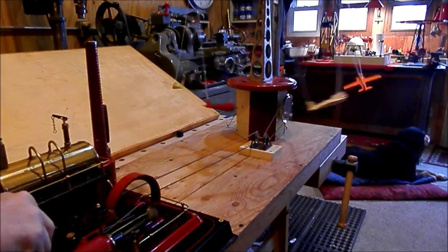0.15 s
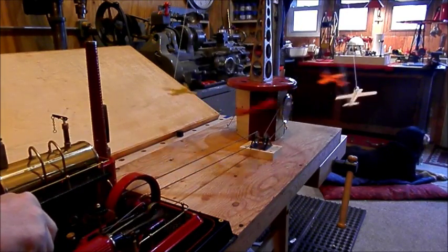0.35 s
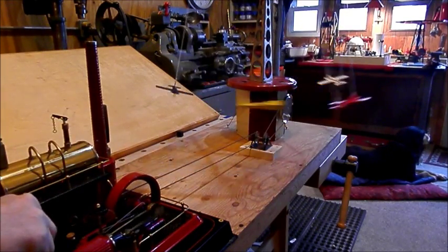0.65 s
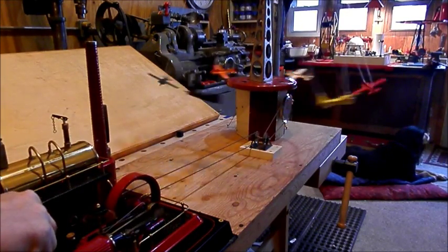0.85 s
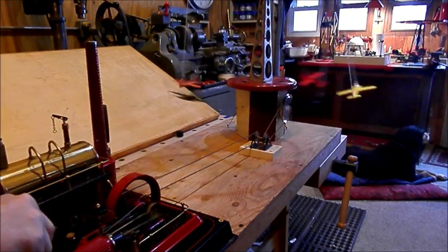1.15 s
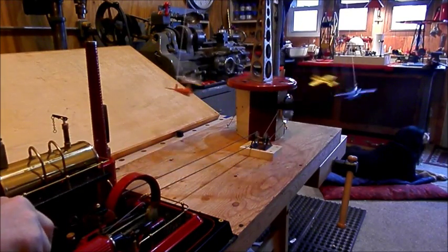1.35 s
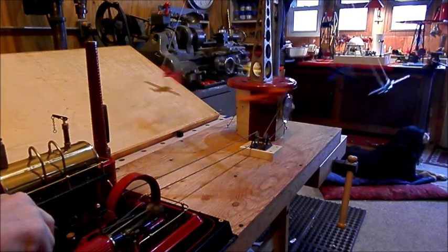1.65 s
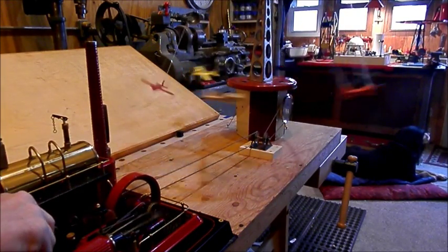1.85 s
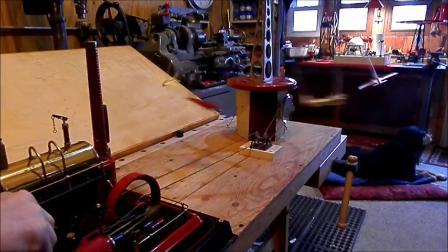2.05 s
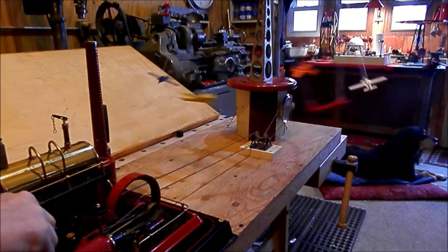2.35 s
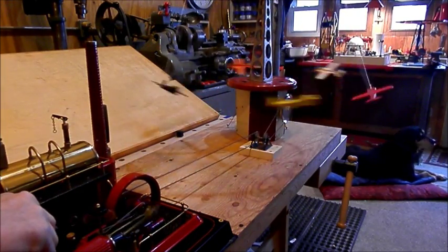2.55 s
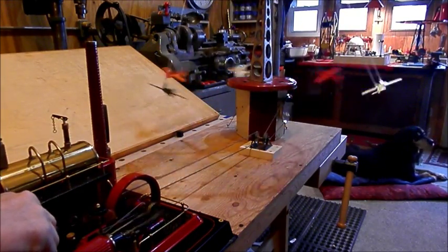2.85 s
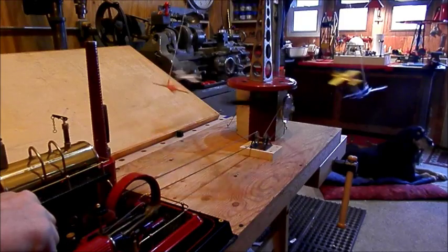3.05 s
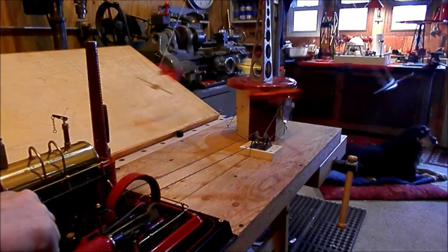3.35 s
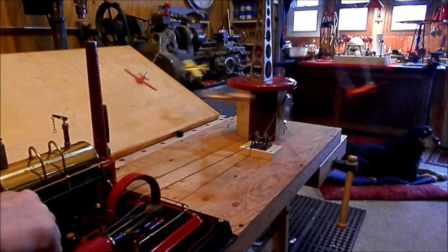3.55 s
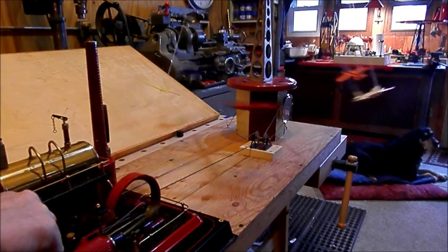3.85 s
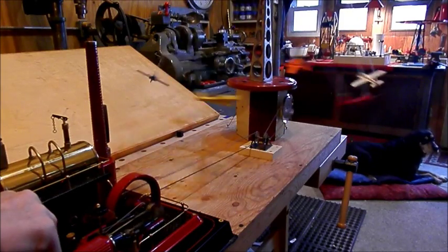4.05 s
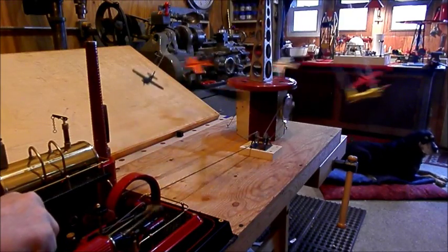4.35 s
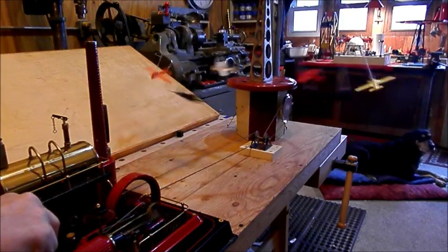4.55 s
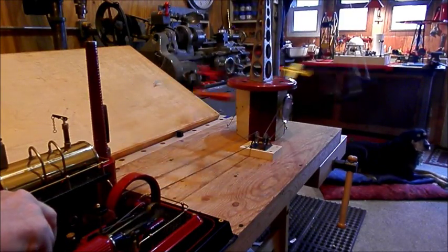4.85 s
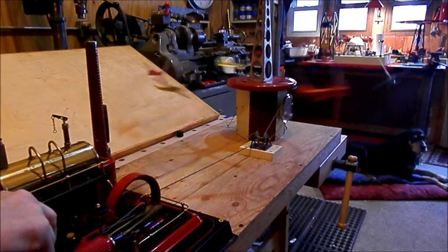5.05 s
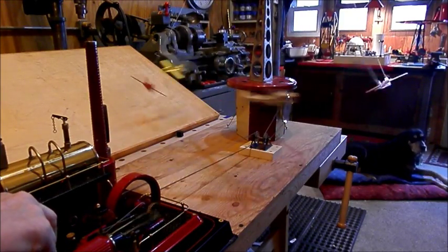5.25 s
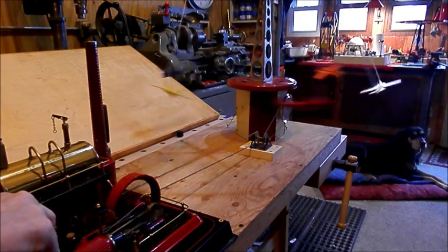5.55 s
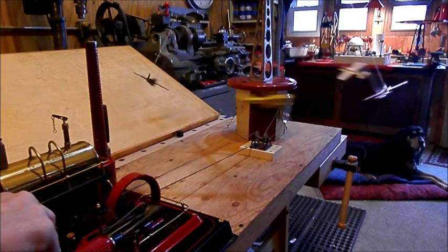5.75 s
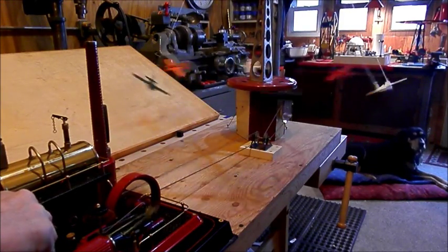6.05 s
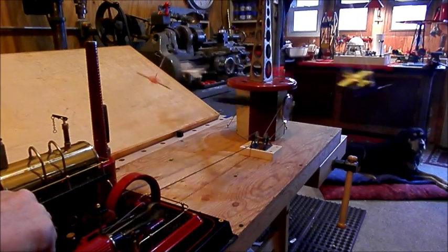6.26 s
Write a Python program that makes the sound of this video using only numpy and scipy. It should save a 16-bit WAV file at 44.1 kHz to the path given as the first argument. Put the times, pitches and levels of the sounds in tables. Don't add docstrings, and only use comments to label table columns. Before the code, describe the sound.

A toy steam engine clatters on a wooden bench, speeding from seven to about thirteen metallic knocks a second, with hiss and thin squeaks.

```python
import sys
import numpy as np
from scipy import signal
from scipy.fft import rfft, irfft, next_fast_len
from scipy.io import wavfile
from scipy.ndimage import uniform_filter1d, minimum_filter1d, map_coordinates

SR = 44100
rng = np.random.default_rng(int(sys.argv[2]) if len(sys.argv) > 2 else 0)


def dump(signal):
    limited = np.clip(np.atleast_2d(signal).T, -1, 1)
    pcm = np.round(limited * 32767).astype(np.int16)
    wavfile.write(sys.argv[1], SR, pcm)


def volts(x):
    e = np.asarray(x, float) / 20
    return 10 ** e


N = 282681

# frequency in Hz, t60 in seconds.
ROOM_DECAY = [(100, 0.054), (500, 0.11), (2500, 0.65), (5000, 0.48), (10000, 0.72)]
# frequency in Hz, density in dB per Hz.
RUMBLE_SPECTRUM = [(24, -52), (40, -21), (109, 10), (197, -7.5), (262, -2.5), (324, -1.5), (433, -0.5),
                   (595, -0.5), (703, -7), (843, -8), (909, -11), (1030, -5), (1120, -8.5), (1500, -22.5),
                   (1950, -31), (3300, -120)]
# frequency in Hz, density in dB per Hz.
STEAM_SPECTRUM = [(590, -9), (1000, -4), (1580, -2.5), (2320, 1), (2460, 0), (2870, -6), (3380, -12.5),
                  (3840, -3), (5710, -18), (6890, -17), (7930, -33), (9230, -28.5), (11100, -40.5),
                  (15300, -43), (16400, -57)]
# start in seconds, length in seconds, level in dB.
DRONE_SPELLS = [
    (-.5, 1.1, -52),
    (.4, 1.2, -58),
    (5.4, 1.2, -63),
]
# time in seconds, frequency in Hz.
DRONE_PITCH = [(0, 279), (.45, 270), (1.45, 279), (5.4, 265)]
# frequency in Hz, waver in Hz.
SQUEAL_TONES = [(6750, 17.8), (6905, 18), (7400, 14)]
# start in seconds, length in seconds, level in dB.
SQUEAL_SPELLS = [
    [(.2, 0.24, -50.5), (.58, 0.15, -53), (1.1, 0.1, -58), (1.33, 0.16, -51.5), (2.0, 0.099, -59),
     (2.88, 0.14, -52), (4.05, 0.2, -51), (4.54, 0.094, -53), (4.75, 0.19, -55), (5.64, 0.25, -52),
     (5.95, 0.054, -54), (6.32, 0.14, -56.5)],
    [(.85, 0.12, -62), (2.36, 0.2, -46.5), (3.04, 0.095, -50.5), (3.12, 0.24, -47), (3.3, 0.24, -49.5),
     (4.02, 0.13, -45.5), (4.78, 0.2, -46), (5.0, .14, -44.5), (5.66, 0.14, -47.5), (6.33, 0.078, -52.5)],
    [(1.39, 0.35, -48), (1.82, 0.19, -53.5), (3.56, .15, -59), (4.7, 0.089, -53), (5.0, 0.21, -72),
     (5.18, 0.15, -53), (6.33, .11, -64)],
]
# frequency in Hz, width in Hz, level in dB.
SCRAPE_PEAKS = [(5625, 190, 6.5), (6040, 250, 10.5), (6600, 220, 8), (6480, 200, 12.5), (6900, 1000, 3)]
# start in seconds, length in seconds, level in dB.
SCRAPE_SPELLS = [(-.1, 0.25, -47.5), (.1, 0.25, -55.5), (.6, 0.2, -69), (.8, 0.18, -68), (1.33, 0.16, -74),
                 (1.9, 0.48, -54), (2.85, 0.2, -59), (3.1, 0.37, -64), (3.57, 0.21, -58), (4.1, 0.15, -64),
                 (4.7, 0.51, -66), (5.25, 0.46, -57), (5.55, 0.54, -70), (6.3, 0.27, -65)]
# start in seconds, length in seconds, level in dB.
PULLEY_CHIRPS = [
    (0.714, 0.13, -51.5),
    (2.62, .06, -58),
    (4.215, 0.15, -55),
    (5.875, .045, -53),
]
# time in seconds, peak in dB.
ROD_SLAPS = [(0.0476, -37), (0.0725, -27), (0.094, -29.5), (0.106, -41), (0.453, -47), (0.4214, -40),
             (0.952, -35), (1.768, -36), (2.4535, -28.5), (3.1148, -52), (3.2754, -37), (4.6404, -40),
             (5.3432, -39), (5.66, -32)]
# frequency in Hz, level in dB, t60 in seconds, rise in ms.
FRAME_MODES = [(1306, -13.5, 0.03, 2.5), (1485, -11, 0.04, 3.4), (1737, -23.5, 0.061, 1.1),
               (1933, -27, 0.18, 3.9), (2074, -22, 0.088, 2.6), (2216, -13, 0.085, 3.5),
               (2500, -2.5, 0.032, 1.5), (2820, -15, 0.045, 2.9), (3048, -12, 0.026, 1.6),
               (3241, -2.5, 0.017, 0.96), (3255, -18, .19, 3), (3396, 3, 0.016, 0.24),
               (3607, -3.5, 0.018, 1.25), (3870, -12.5, 0.023, 0.27), (4290, -11.5, 0.019, 0.15),
               (4610, -12, 0.02, 0.28), (5076, -13, 0.021, 0.093), (5505, -15.5, 0.025, 0.2),
               (5890, -23.5, 0.033, 0.88), (5920, -12, 0.021, 0.13), (6910, -12, 0.019, 0.33),
               (7350, -41.5, 0.035, 0.64)]
# frequency in Hz, level in dB, t60 in seconds, rise in ms.
BENCH_MODES = [(79.6, -13, .13, 6.1), (113.3, -9.5, 0.31, 13), (127.2, -14, 0.2, 9.7),
               (259.6, -2, 0.17, 17), (356.7, -9, 0.2, 5.7), (435.2, -1, 0.14, 5.3), (483, -9.5, .12, 5.9),
               (591.8, -9, 0.22, 3.1), (707.7, -5, 0.071, 6.5), (840, -6.5, 0.17, 10.3),
               (805.5, -10, 0.12, 6.2), (982, -2.5, 0.15, 14), (1052, -2.5, 0.13, 9), (1305, -29, 0.033, 1)]
# frequency in Hz, density in dB per Hz.
CONTACT_SPECTRUM = [(1500, -19), (3000, -3), (5000, 1), (7000, -7.5), (9000, -9.5), (12000, -24.5),
                    (16000, -30)]
# time in seconds, turns per second.
SHAFT_SPEED = [(0, 7.17), (.5, 9.17), (.85, 10.309), (1.07, 10.673), (1.26, 10.662), (1.75, 11.819),
               (2.18, 11.596), (2.69, 12.236), (3, 11.986), (3.47, 12.648), (3.95, 12.223), (4.33, 12.588),
               (4.68, 12.488), (4.97, 12.85), (5.16, 13.018), (5.52, 12.593), (5.89, 12.97), (6.41, 12.884)]
# time in seconds, knock peak in dB.
PISTON_FORCE = [(0.12, -20), (.45, -22), (.69, -20.5), (.8, -22.5), (1.2, -23), (1.7, -22), (2.3, -21),
                (2.75, -21), (3.2, -22), (3.75, -23.5), (4.03, -21.5), (4.27, -21), (4.74, -22.5),
                (4.83, -19.5), (4.91, -22.5), (5.37, -22), (5.82, -19.5), (6.2, -22.7)]
# frequency in Hz, change in dB.
SLACK_COLOUR = [(1300, -4), (1483, 6.5), (1750, -10), (3075, 5.5), (3391, -6.5), (3614, 6.5), (3820, 5.5),
                (4640, -1.5)]
# frequency in Hz, dB per turn per second.
SPEED_COLOUR = [(90, 1), (116, 3.5), (123, -3), (260, 0), (440, -0.4), (478, -3), (845, 3), (1030, -0.8)]
# time in seconds, extra level in dB.
BASE_JOLTS = [
    (.79, 4),
    (1.36, 3),
    (2.65, -1),
    (4.03, 1),
    (4.19, 2.5),
    (4.83, 1),
    (5.14, 0),
    (5.84, 0.5),
    (5.92, 1),
]
# frequency in Hz, gain in dB.
MICROPHONE_RESPONSE = [(20, -23), (75, 3), (7350, 2.5), (7700, -10.5), (7900, -6), (8150, -18), (8400, 2.5),
                       (20000, 7)]

START_TURN = 0.114
CRUISE = 11.7
KNOCK_SCATTER_DB = 0.88
BENCH_DB, BENCH_GROWS, BENCH_SCATTER_DB = -13.5, 0.19, 0.26
SLACK = (5.22, 1, 0)
RUMBLE_DB, RUMBLE_GROWS = -52.5, 1
STEAM_DB, STEAM_GROWS = -52, 0.85
RUMBLE_FLOOR_HZ = 149
DRONE_DB, IDLE_SCRAPE_DB, IDLE_SQUEAL_DB = -70, -63.5, -79
SPELL_EDGE = 0.82
TICK_TURN, TICK_DB = 0.62, -29
TICK_FADES, TICK_SCATTER_DB = 2.1, 2.5
BOUNCE_S, BOUNCE_DB = 0.009, -5.5
LIMIT = 0.091


def unit(x):
    return x / np.sqrt(np.mean(x ** 2) + 1e-20)


def along(points, hz):
    f, v = np.transpose(points)
    return np.interp(np.log(hz + 1), np.log(f + 1), v)


def at(points, s):
    return np.interp(s, *np.transpose(points))


def clock():
    return np.arange(N) / SR


def wobble(rate):
    return map_coordinates(rng.standard_normal(int(N * rate / SR) + 4), [np.arange(N) * rate / SR])


def noise(response):
    m = next_fast_len(N)
    spectrum = rfft(rng.standard_normal(m))
    return unit(irfft(spectrum * response(np.fft.rfftfreq(m, 1 / SR)), m)[:N])


def coloured(points):
    return noise(lambda f: volts(along(points, f)))


def peak(f, hz, width):
    return 1 / (1 + (2 * (f - hz) / width) ** 2)


def sine(hz):
    return np.sin(2 * np.pi * np.cumsum(hz) / SR)


def half_sine(s, length):
    return np.sin(np.pi * np.clip((clock() - s) / length, 0, 1)).clip(0)


def spells(rows, idle_db):
    return volts(idle_db) + sum(volts(db) * half_sine(s, length) ** SPELL_EDGE for s, length, db in rows)


def turns():
    return START_TURN + np.cumsum(at(SHAFT_SPEED, clock())) / SR


def moments(share):
    angle = turns()
    angles = np.r_[0, angle]
    times = np.r_[-START_TURN / SHAFT_SPEED[0][1], clock()]
    return np.interp(np.arange(int(angle[-1] - share) + 1) + share, angles, times)


def force_swing():
    force_db = at(PISTON_FORCE, clock())
    return force_db - force_db.mean()


def struck(blows, modes, scatter_db, slip, lean_db=0, drift_db=0):
    hz, db, t60, rise_ms = np.transpose(modes)[..., None]
    t = np.arange(SR // 5) / SR
    swell = volts(db - 60 * t / t60) * (1 - np.exp(-1000 * t / rise_ms)) ** 2
    phase = 2 * np.pi * hz * t + np.pi * np.arange(len(modes))[:, None]
    sines, cosines = swell * np.sin(phase), swell * np.cos(phase)
    chance = rng.standard_normal((len(blows), 2, len(modes)))
    slow = unit(uniform_filter1d(rng.standard_normal((len(blows), len(modes))), size=7, axis=0))
    out = np.zeros(N + SR)
    for (s, level), (a, b), colour_db in zip(blows, chance, lean_db + drift_db * slow):
        gain = volts(level + scatter_db * a + colour_db)
        ring = (gain * np.cos(slip * b)) @ sines + (gain * np.sin(slip * b)) @ cosines
        out[round((s + 0.1) * SR):][:len(t)] += ring
    return out[SR // 10:][:N]


def snaps(blows, t60):
    kicks = np.zeros(N)
    for s, db in blows:
        kicks[round(max(s, 0) * SR)] = volts(db)
    fade = volts(-60 * np.arange(SR // 20) / SR / t60)
    return signal.fftconvolve(kicks, fade)[:N] * coloured(CONTACT_SPECTRUM)


def shudder(blows, spectrum, t60, rise):
    kicks = np.zeros(N + SR // 10)
    for s, db in blows:
        kicks[round((s + 0.1) * SR)] = volts(db)
    t = np.arange(SR // 2) / SR
    rings = coloured(spectrum)[:SR].reshape(2, -1)
    rings = rings * volts(-60 * t / t60) * (1 - np.exp(-t / rise))
    drift = np.linspace(0, 1.2, len(kicks))
    first = signal.fftconvolve(kicks * np.cos(drift), rings[0])
    second = signal.fftconvolve(kicks * np.sin(drift), rings[1])
    return (first + second)[SR // 10:][:N]


def shop(x):
    hz, t, z = signal.stft(rng.standard_normal(SR // 2), SR, nperseg=256)
    fade = volts(-60 * t / along(ROOM_DECAY, hz)[:, None])
    tail = signal.istft(z * fade, SR, nperseg=256)[1]
    return signal.fftconvolve(np.pad(x, (300, 0)), tail / np.linalg.norm(tail))[:N]


def rumble():
    gain = volts(RUMBLE_DB + RUMBLE_GROWS * force_swing() + 1.5 * wobble(25))
    return gain * noise(lambda f: volts(along(RUMBLE_SPECTRUM, f)) / (1 + (RUMBLE_FLOOR_HZ / (f + 1)) ** 2))


def belt():
    gain = spells(DRONE_SPELLS, DRONE_DB) * volts(2.2 * wobble(12))
    return gain * sine(at(DRONE_PITCH, clock()) + 1.9 * wobble(15))


def steam():
    puff_db = -5 * (turns() % 1 - 0.5) + 1.5 * wobble(60)
    return volts(STEAM_DB + STEAM_GROWS * force_swing() + puff_db) * coloured(STEAM_SPECTRUM)


def scrape():
    rub = np.zeros(N)
    for hz, width, db in SCRAPE_PEAKS:
        rub += volts(db + 3.1 * wobble(7)) * np.sqrt(width) * noise(lambda f: peak(f, hz, width))
    return spells(SCRAPE_SPELLS, IDLE_SCRAPE_DB) * volts(3.3 * wobble(40)) * unit(rub)


def squeal():
    out = np.zeros(N)
    for (hz, waver), rows in zip(SQUEAL_TONES, SQUEAL_SPELLS):
        tone = sine(hz + waver * wobble(150) + waver * wobble(4.9))
        gain = spells(rows, IDLE_SQUEAL_DB) * volts(1.94 * wobble(30))
        hiss = volts(-3) * noise(lambda f: peak(f, hz, 400))
        octave = volts(21) * gain * noise(lambda f: peak(f, 2 * hz, 500))
        out += gain * (tone + hiss + octave)
    return out


def pulley():
    swells = sum(volts(db) * np.sqrt(half_sine(s, length)) for s, length, db in PULLEY_CHIRPS)
    return swells * noise(lambda f: peak(f, 5060, 70) + volts(-29.5) * peak(f, 10400, 600))


def valve():
    s = moments(TICK_TURN)
    db = TICK_DB - TICK_FADES * (at(SHAFT_SPEED, s) - 8) + TICK_SCATTER_DB * rng.standard_normal(len(s))
    ticks = np.c_[s, db - 2.5]
    blows = np.r_[ticks, ticks + [BOUNCE_S, BOUNCE_DB], ROD_SLAPS] - [0, 6]
    upper = [(hz, db / 2, 1.05 * t60, 0.3) for hz, db, t60, _ in FRAME_MODES[11:15]]
    ring = struck(blows, upper, scatter_db=3, slip=2.6)
    tin = shudder(blows - [0, 9], STEAM_SPECTRUM, t60=0.066, rise=0.0011)
    return ring + tin + snaps(blows - [0, 19], t60=0.014)


def crank():
    s = moments(0)
    db = at(PISTON_FORCE, s) + KNOCK_SCATTER_DB * rng.standard_normal(len(s))
    share = BENCH_DB + BENCH_GROWS * (db - db.mean()) + BENCH_SCATTER_DB * rng.standard_normal(len(s))
    for when, extra_db in BASE_JOLTS:
        share = share + extra_db * (abs(s - when) < 0.03)
    slack = spells([SLACK], -60)[(s.clip(0) * SR).astype(int)]
    loose_db = np.outer(slack, along(SLACK_COLOUR, np.transpose(FRAME_MODES)[0]))
    fast_db = np.outer(at(SHAFT_SPEED, s) - CRUISE, along(SPEED_COLOUR, np.transpose(BENCH_MODES)[0]))
    frame = struck(np.c_[s, db - 1.5], FRAME_MODES, scatter_db=2.13, slip=0.21, lean_db=loose_db, drift_db=1.1)
    bench = struck(np.c_[s, db + share - 3], BENCH_MODES, scatter_db=0.77, slip=0.064,
                   lean_db=fast_db, drift_db=1.57)
    wood_spectrum = [(24, -60), (150, -16)] + RUMBLE_SPECTRUM[3:]
    wood = shudder(np.c_[s, db + share - 11], wood_spectrum, t60=0.44, rise=0.016)
    tin = shudder(np.c_[s, db - 17], STEAM_SPECTRUM, t60=0.19, rise=0.0024)
    cracks = np.c_[s, db - 12 + 1.5 * rng.standard_normal(len(s))][1:]
    return frame + tin + snaps(cracks, t60=0.021), bench + wood


def scene():
    metal, bench = crank()
    engine = metal + valve()
    steady = rumble() + belt() + steam()
    friction = scrape() + squeal() + pulley()
    return (engine + bench + volts(-15) * shop(engine) + steady + friction)[None]


def band_limit(x):
    return signal.sosfilt(signal.butter(12, 15750, fs=SR, output="sos"), x)


def record(dry):
    m = next_fast_len(N + 4096)
    response = volts(along(MICROPHONE_RESPONSE, np.fft.rfftfreq(m, 1 / SR)))
    x = irfft(rfft(dry, m) * response, m)[:, :N]
    need = np.minimum(1, LIMIT / (np.abs(x) + 1e-9))
    duck = uniform_filter1d(minimum_filter1d(need, size=25), size=25)
    return band_limit(x * duck)


dry = scene()
out = record(dry)
dump(out)
```